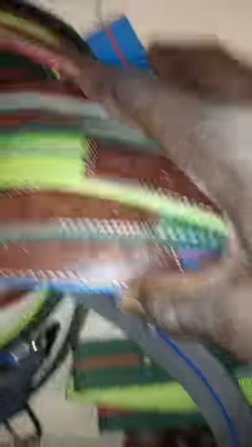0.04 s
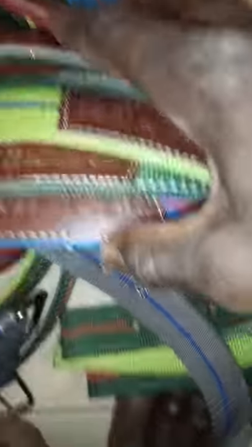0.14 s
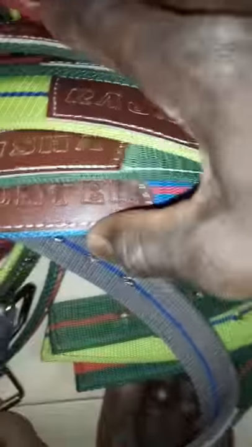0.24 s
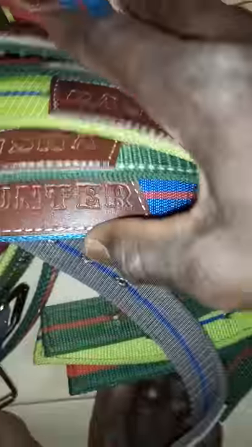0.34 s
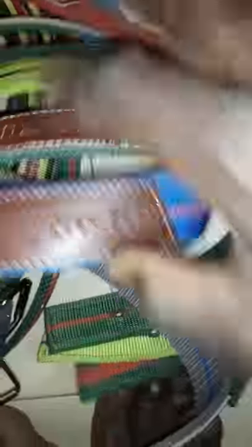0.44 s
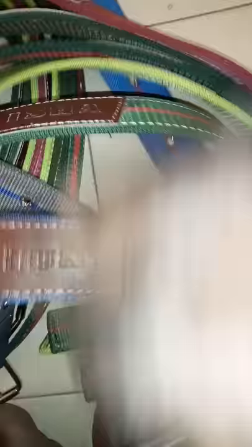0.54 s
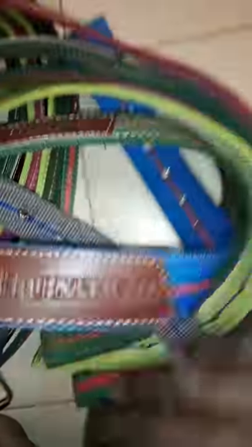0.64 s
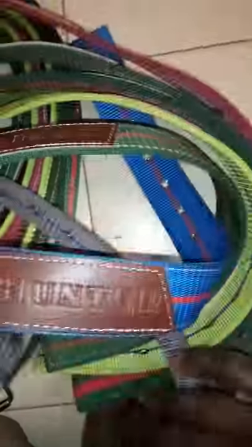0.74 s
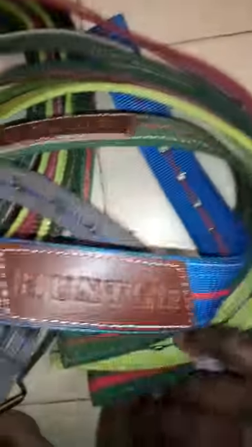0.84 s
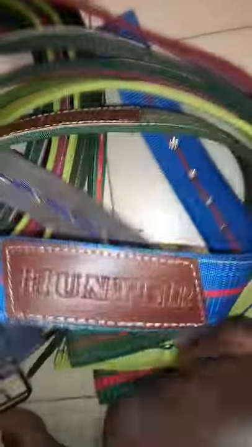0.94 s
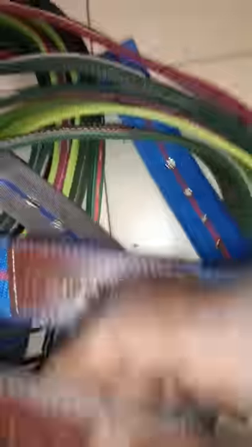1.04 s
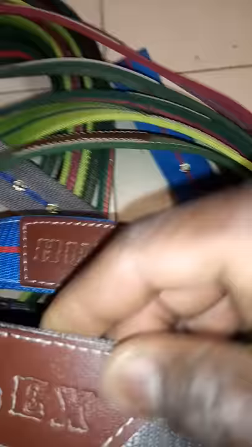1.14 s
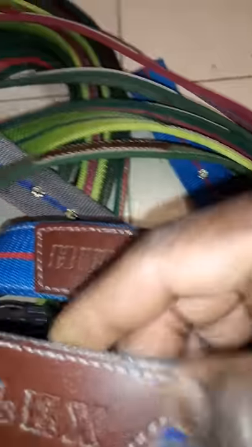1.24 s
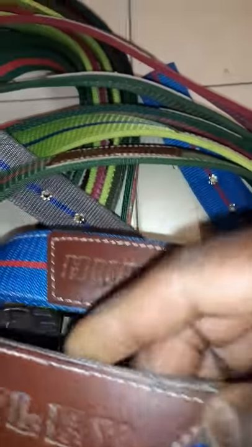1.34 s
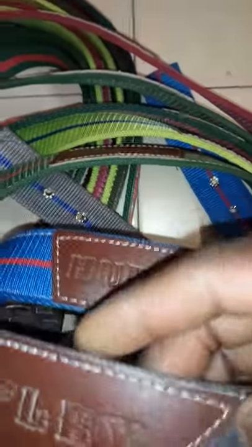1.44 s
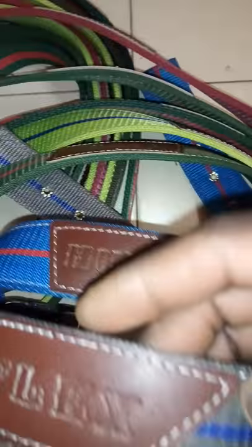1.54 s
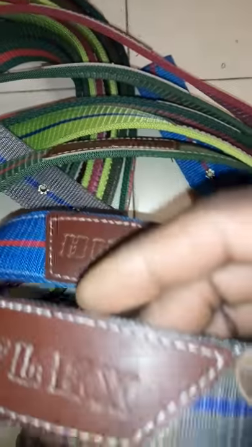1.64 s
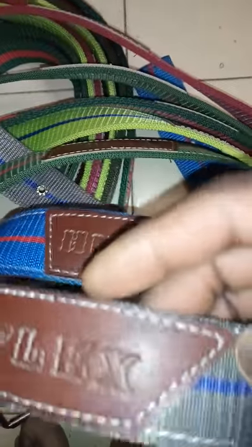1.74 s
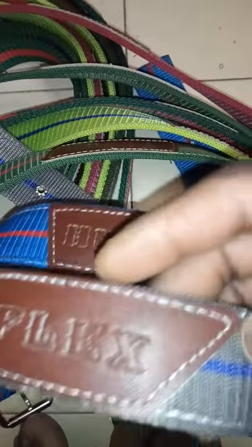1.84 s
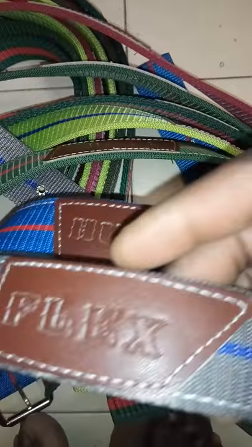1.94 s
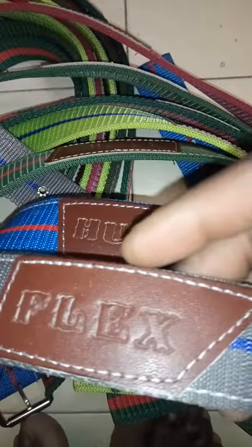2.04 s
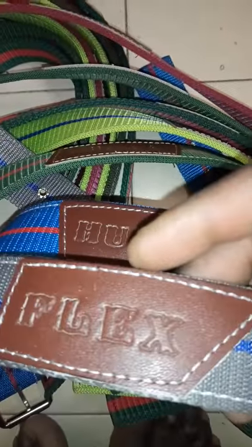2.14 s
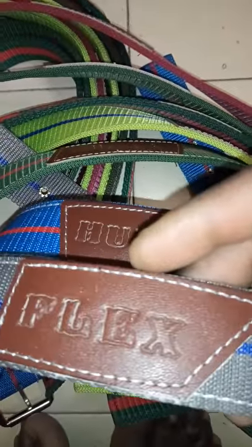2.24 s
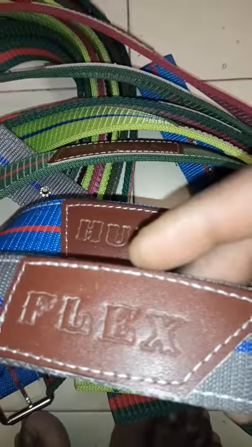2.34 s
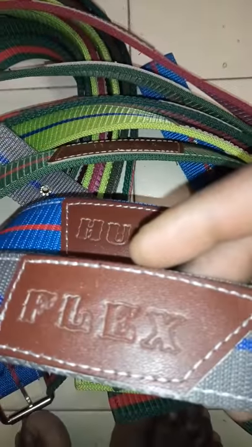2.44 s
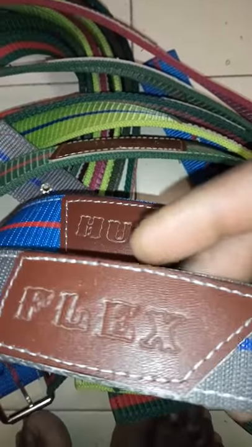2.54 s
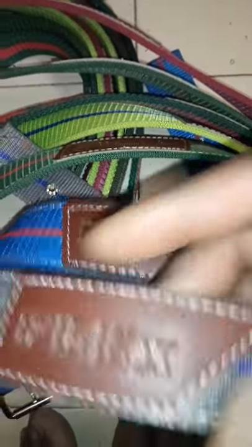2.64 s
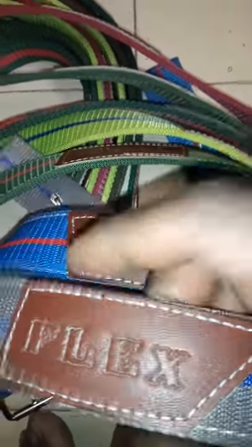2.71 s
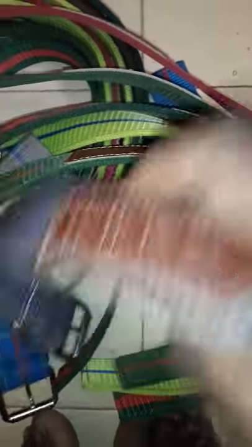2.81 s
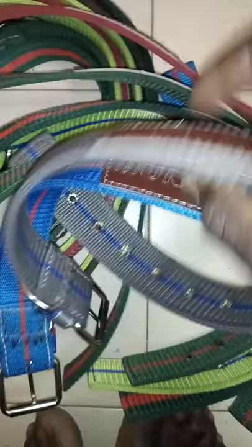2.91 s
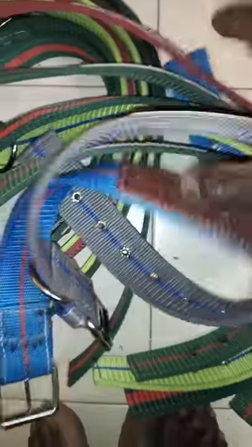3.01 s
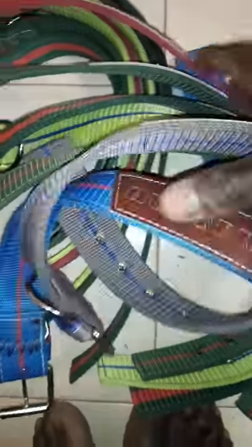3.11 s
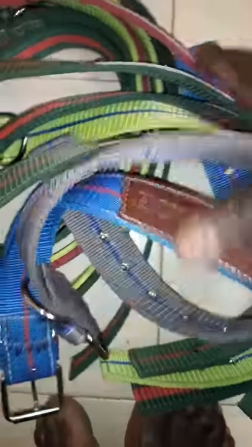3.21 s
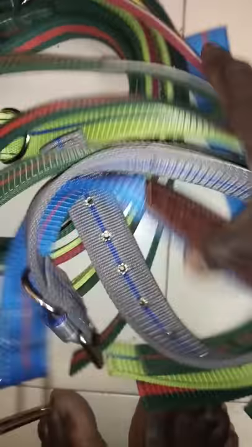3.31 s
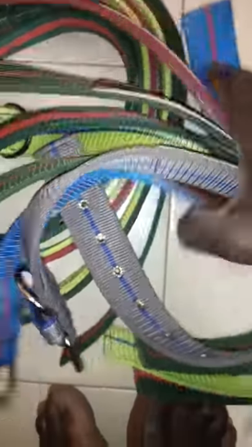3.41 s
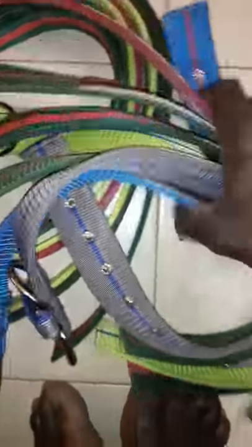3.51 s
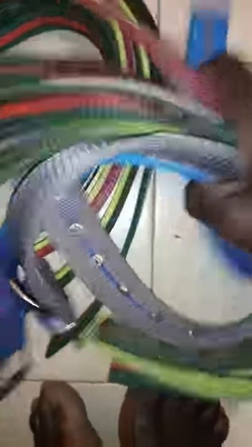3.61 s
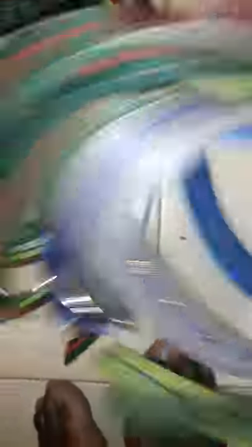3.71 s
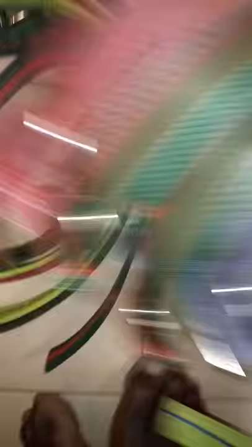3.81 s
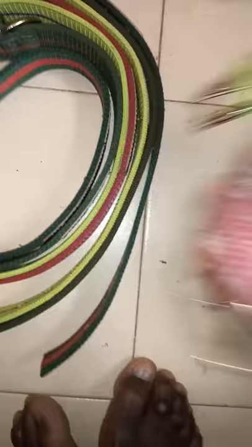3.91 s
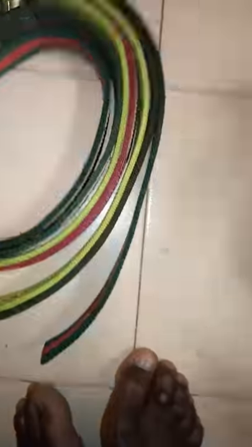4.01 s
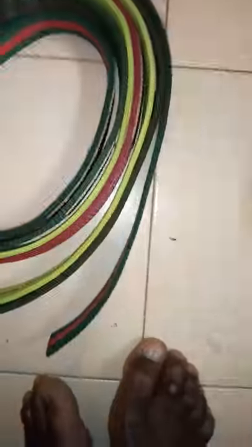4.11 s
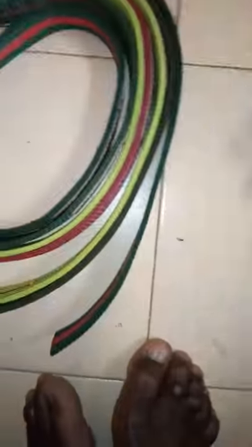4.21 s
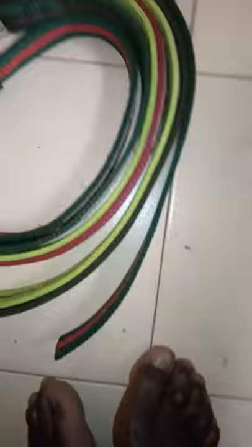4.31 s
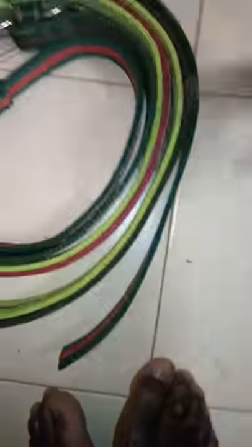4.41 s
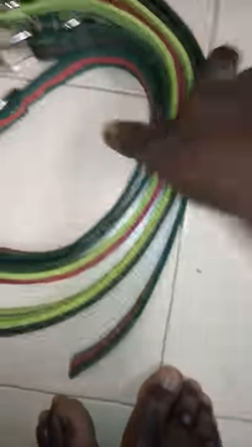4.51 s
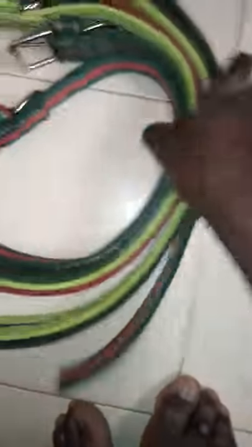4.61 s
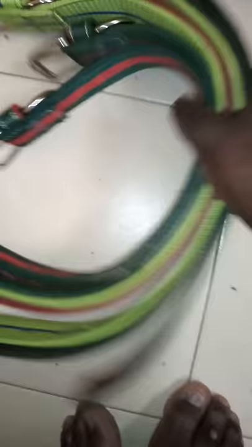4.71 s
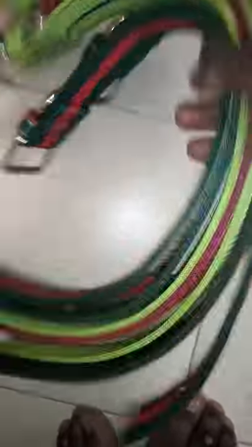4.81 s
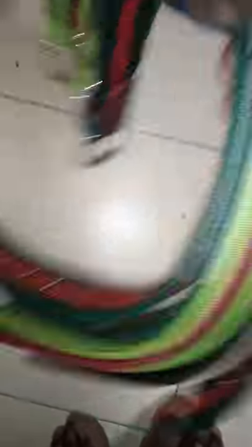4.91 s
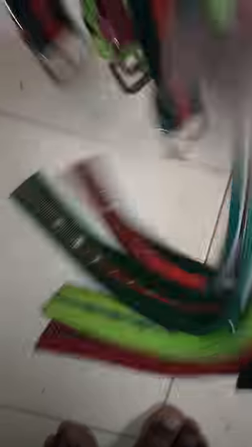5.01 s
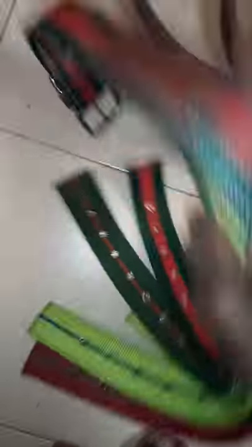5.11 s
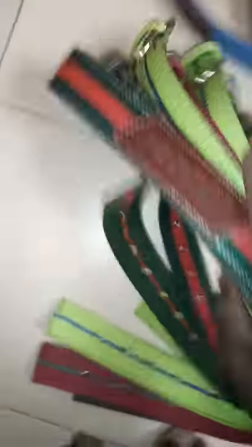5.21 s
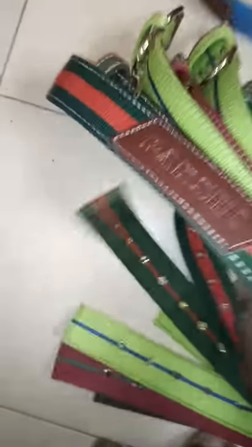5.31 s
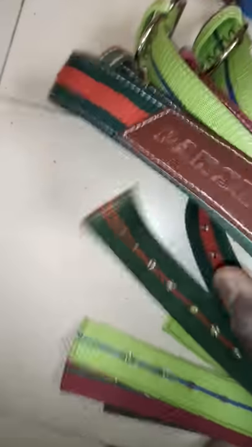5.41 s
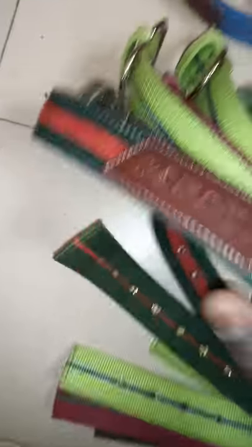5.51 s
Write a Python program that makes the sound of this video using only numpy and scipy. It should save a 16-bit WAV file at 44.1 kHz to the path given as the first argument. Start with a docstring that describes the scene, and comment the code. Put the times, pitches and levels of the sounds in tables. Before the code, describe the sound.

Stiff nylon straps are handled close to the microphone in a quiet tiled room. The webbing rustles and snaps, with soft bumps and light metal clinks. After about a second the hands rest, leaving a faint low hum and a dry tick. Then the handling returns and grows louder, with sharp clicks and buckles and rings chattering.

```python
"""A pile of nylon dog collars is handled near a microphone in a quiet tiled room with faint whines.
At first stiff webbing rustles, straps bump softly on the floor, the webbing snaps and steel clinks.
After about a second the hands rest, a low hum swells once and fades, and one dry tick follows.
Near 2.7 seconds the handling returns and grows louder, with rings and, later, buckles chattering."""
import sys
import numpy as np
from scipy import signal
from scipy.fft import rfft, irfft
from scipy.io import wavfile

SR = 44100
rng = np.random.default_rng(int(sys.argv[2]) if len(sys.argv) > 2 else 0)


def wav_record(signal):
    """Record a signal, one row per channel, as 16-bit PCM in the file named by sys.argv[1]."""
    frames = np.transpose(np.atleast_2d(signal))
    bounded = np.clip(frames, -1, 1)
    # unit amplitude maps onto the largest positive 16-bit level
    quanta = np.round(bounded * 32767).astype(np.int16)
    wavfile.write(sys.argv[1], SR, quanta)


N = 244755
TIME = np.arange(N) / SR


def from_db(db):
    return 10 ** (np.asarray(db) / 20)


def rms_one(x):
    return x / np.sqrt(np.mean(x ** 2) + 1e-20)


def in_time(rows):
    """Joins each column's points with straight lines."""
    times, *columns = np.transpose(rows)
    return [np.interp(TIME, times, column) for column in columns]


def add(out, start, sound):
    i = round(start * SR)
    out[i:i + len(sound)] += sound[:N - i]


def gate(start, end, fade_s):
    return np.clip(np.minimum(TIME - start, end - TIME) / fade_s, 0, 1)


def colour(x, points, size=8192):
    """Gives a sound a tone colour, with a minimum-phase filter so nothing sounds early."""
    hz, db = np.transpose(points)
    bin_hz = np.arange(size // 2 + 1) * SR / size
    cepstrum = irfft(np.interp(np.log(bin_hz + 1), np.log(hz), db) * np.log(10) / 20)
    cepstrum[1:size // 2] *= 2
    cepstrum[size // 2 + 1:] = 0
    impulse = irfft(np.exp(rfft(cepstrum)))
    return signal.fftconvolve(x, impulse / np.sqrt(np.sum(impulse ** 2)))[:N]


def drift(hz):
    """A slow random wobble."""
    r = np.exp(-2 * np.pi * hz / SR)
    return rms_one(signal.lfilter([1], [1, -2 * r, r * r], rng.standard_normal(N + SR))[SR:])


def ring(clicks, hz, t60):
    """Each click starts a tone that fades by 60 dB in t60 seconds."""
    r, w = from_db(-60 / (t60 * SR)), 2 * np.pi * hz / SR
    return signal.lfilter([0, np.sin(w)], [1, -2 * r * np.cos(w), r * r], clicks + 1e-18)


def catches(per_s, spread_db, clump_db):
    """Surfaces catch and let go, making clumps of tiny uneven clicks."""
    sizes = from_db(spread_db * np.minimum(rng.exponential(1, N), 4)) * rng.choice([-1, 1], N)
    happens = rng.random(N) < per_s * from_db(clump_db * drift(30)) / SR
    return rms_one(sizes * happens)


def patches(clicks, low_hz, high_hz, cycles, count=14):
    """Each click rings one patch of stiff weave, and each patch has its own pitch."""
    patch = rng.integers(0, count, N)
    pitches = np.geomspace(low_hz, high_hz, count)
    return rms_one(sum(ring(clicks * (patch == k), hz, cycles / hz) for k, hz in enumerate(pitches)))


# Tone colours of the rustle and its high hiss through the microphone, and of the strap.
# Each row: frequency in Hz, level in dB.
RUSTLE_MIC_COLOUR = [(1500, -25), (2500, -15), (3200, 1.5), (4490, 8.5), (6250, 1.5), (7300, -7.5),
                     (8300, -20.5), (11000, -81.5)]
HISS_MIC_COLOUR = [(7000, -88.5), (8500, -11), (11500, -16.5), (13300, -1.5), (14200, -15), (14800, 15.5),
                   (15600, 8.5), (16000, -24), (16800, -47)]
STRAP_COLOUR = [(100, -18), (250, -9), (500, 0), (1000, 3), (1100, 6), (2200, 5.5), (3200, 6), (6000, -105)]
# The hands at work. Each row: time in seconds, rubbing level in dB, treble level in dB.
HAND_LEVELS = [(0, -61, -67), (.43, -60.5, -73), (.45, -49, -41), (.61, -57.5, -64), (.64, -47.5, -42),
               (.79, -47.5, -61), (.95, -45.5, -51), (1.09, -53, -60), (1.2, -58, -66), (1.33, -70, -97),
               (1.62, -80.5, -107.5), (2.46, -83, -100), (2.5, -69, -88), (2.67, -67, -96),
               (2.7, -48.5, -60), (2.79, -58, -71), (2.99, -50.5, -61), (3.07, -45, -42),
               (3.12, -55.5, -70), (3.38, -38.5, -35), (3.45, -46.5, -47), (3.58, -38.5, -30.5),
               (3.93, -44.5, -40), (3.97, -38, -32.5), (4.11, -31.5, -27), (4.29, -35, -37.5),
               (4.37, -41.5, -51), (4.49, -52.5, -67), (4.67, -50.5, -49), (4.72, -38.5, -39.5),
               (4.94, -44.5, -45), (5.05, -47.5, -40), (5.16, -29, -26), (5.35, -43, -48.5),
               (5.45, -53.5, -66), (5.55, -39.5, -49)]
# The low part of the rubbing. Each row: time in seconds, level in dB.
STRAP_LEVELS = [(0, -63.5), (.43, -55.5), (.46, -51.5), (.75, -54), (1.09, -55.5), (1.2, -62), (1.33, -85),
                (1.46, -66.5), (1.6, -80.5), (2.5, -79.5), (2.66, -73), (2.72, -57.5), (3.1, -55.5),
                (3.49, -46), (3.74, -50), (3.93, -54), (3.97, -46), (4.14, -37.5), (4.34, -45.5),
                (4.5, -52.5), (4.78, -48.5), (4.9, -53.5), (5.07, -55.5), (5.1, -40.5), (5.25, -44),
                (5.42, -59), (5.55, -55)]


def rustle():
    """Rubbing threads shake the weave and the whole strap, over a smooth hiss."""
    rub_db, treble_db = in_time(HAND_LEVELS)
    strap_db, = in_time(STRAP_LEVELS)
    rub = catches(2200, spread_db=3, clump_db=3.5)
    hiss = rng.standard_normal(N)
    weave = patches(rub, 2682, 6830, cycles=84) + hiss
    treble = patches(rub, 11400, 22000, cycles=450) + hiss
    strap = patches(catches(900, spread_db=2.5, clump_db=4.5), 200, 3190, cycles=12.4) + hiss
    return (colour(weave * from_db(rub_db - 5.5), RUSTLE_MIC_COLOUR)
            + colour(treble * from_db(treble_db - 12.5), HISS_MIC_COLOUR)
            + colour(strap * from_db(strap_db - 5), STRAP_COLOUR))


# The bright colour of metal. Each row: frequency in Hz, level in dB.
GLINT_COLOUR = [(5500, -36.5), (7500, -3), (9300, 6), (11000, -1), (12500, -8), (14000, -19)]
# Steel rings give way to a buckle prong. Each row: time in seconds, the prong's share from 0 to 1.
PRONG_SHARE = [(0, 0), (4.55, 0), (4.63, 1), (5.55, 1)]


def shimmer(still_db=-85):
    """Light touches ring the metal over a thin hiss; a resting pile does not ring."""
    _, treble_db = in_time(HAND_LEVELS)
    level_db = -69 + 0.9 * (treble_db + 50)
    share, = in_time(PRONG_SHARE)
    touches = catches(300, spread_db=4, clump_db=5) * from_db(level_db) * (level_db > still_db)
    tones = CONTACT_TONES["ring"]
    struck = rng.integers(0, len(tones), N)
    steel = sum(from_db(db - 13) * ring(touches * (1 - share) * (struck == k), hz, t60=0.04)
                for k, (hz, db) in enumerate(tones))
    prong = ring(share * from_db(level_db - 19) * rng.standard_normal(N), hz=9300, t60=0.006)
    hiss = from_db(level_db - 6) * rng.standard_normal(N)
    return colour(steel + prong + hiss + from_db(-8) * touches, GLINT_COLOUR)


# The rumble's deep colour. Each row: frequency in Hz, level in dB.
RUMBLE_COLOUR = [(25, -20), (45, -17.5), (70, 2.5), (150, 3), (250, 0.5), (500, -18), (2000, -115)]
# Shifts of the grip. Each row: time in seconds, level in dB.
GRIP_SHIFTS = [(0.01, -60), (.17, -46), (.46, -55), (.62, -81), (.94, -52.5), (1.47, -65.5), (2.8, -63.5),
               (4.22, -68), (4.51, -51), (4.95, -73), (5.17, -57)]


def rumble(rise_s=0.02, fall_s=0.052):
    """The hands make an uneven rumble that surges when the grip shifts."""
    rub_db, _ = in_time(HAND_LEVELS)
    rubbing = from_db(-68.5 + 0.33 * (rub_db + 50))
    surges = sum(from_db(db) * np.exp(np.minimum((TIME - peak) / rise_s, (peak - TIME) / fall_s))
                 for peak, db in GRIP_SHIFTS)
    wobble = from_db(4.5 * drift(29))
    return colour((rubbing + surges) * wobble * rng.standard_normal(N), RUMBLE_COLOUR)


# The colour of the quiet room. Each row: frequency in Hz, level in dB.
AIR_COLOUR = [(25, -19.5), (60, 8), (300, -7), (600, -3.5), (1400, -24), (3340, -35), (6000, -21),
              (8230, -29.5), (12000, -27), (15400, -19), (16100, -67)]


def air():
    """Room air makes a soft, steady noise."""
    return from_db(-77) * colour(rng.standard_normal(N), AIR_COLOUR)


# Background whines. Each row: pitch in Hz, width in Hz, level in dB, start and end in seconds.
WHINE_TONES = [(1567, 8, -83, 0, 5.55), (3180, 20, -87, 1.2, 1.95), (1250, 30, -76, 2.45, 2.9)]


def whines():
    """Narrow bands of noise sound like faint, wavering tones."""
    out = np.zeros(N)
    for hz, width_hz, db, start, end in WHINE_TONES:
        tone = ring(rng.standard_normal(N), hz, t60=np.log(1000) / np.pi / width_hz)
        out += from_db(db) * gate(start, end, fade_s=0.026) * rms_one(tone)
    return out


def tile_echoes(x, t60=0.17):
    """Tiles send back a dense tail of echoes after a few milliseconds."""
    t = np.arange(SR // 2) / SR
    tail = rng.standard_normal(len(t)) * from_db(-60 * t / t60) * (t > 0.004)
    tail = signal.lfilter([0.4], [1, -0.6], tail)  # air and walls dull the tail
    return signal.fftconvolve(x, tail / np.sqrt(np.sum(tail ** 2)))[:N]


# Bumps of straps and fingers. Each row: start in seconds, level in dB, pitch in Hz.
SOFT_BUMPS = [(0.139, -37.5, 380), (0.365, -42.5, 690), (0.447, -39, 615), (0.466, -50, 105),
              (0.612, -48.5, 135), (0.948, -45.5, 101), (1.396, -56, 107), (1.445, -53, 105),
              (1.487, -52, 638), (2.557, -69.5, 128), (2.951, -46.5, 565), (3.955, -46, 536),
              (4.008, -32, 536), (4.502, -57, 200), (4.928, -38, 860), (4.944, -36.5, 480),
              (5.096, -38, 406), (5.362, -40, 221), (5.514, -48, 303)]


def bumps(cycles=7.7):
    """A soft push rings hollow for a few cycles."""
    out = np.zeros(N)
    for start, db, hz in SOFT_BUMPS:
        push = from_db(db + 7.5) * signal.unit_impulse(N, round(start * SR))
        out += ring(push, hz, cycles / hz)
    return signal.sosfilt(signal.butter(2, 90, "high", fs=SR, output="sos"), out)


# Webbing snaps. Each row: start in seconds, level in dB, pitch in Hz,
# then the dB added to that level for the dull knock and for the sharp edge.
WEBBING_SNAPS = [(0.1418, -29.5, 5590, -7, -23), (0.221, -41, 4100, -12, -33), (0.2414, -40, 4100, -7, -36),
                 (0.2643, -51, 5250, -11, -34), (0.2864, -40.5, 4040, -15, -45),
                 (0.3103, -40, 4060, -11, -37), (0.3691, -39.5, 2730, -2, -25),
                 (0.4043, -32, 3010, -24, -30), (0.4472, -33.5, 3680, -11, -15),
                 (0.5247, -37.5, 3220, -15, -15), (0.636, -19, 4150, -27, -19),
                 (0.6564, -24, 6100, -31, -19), (0.6808, -34, 4080, -21, -17),
                 (0.7243, -15.5, 4150, -22, -16), (0.7358, -26, 4440, -19, -16),
                 (0.8589, -30.5, 4900, -12, -14), (0.9005, -25.5, 4630, -22, -20),
                 (0.9277, -28, 4780, -23, -15), (0.985, -27.5, 4370, -25, -18),
                 (1.0083, -31, 4100, -27, -20), (1.0196, -24, 4130, -23, -28),
                 (1.0883, -23.5, 4540, -33, -14), (1.1016, -27, 4440, -27, -13.5),
                 (1.1248, -27, 4460, -36, -27), (1.381, -39, 4450, -37, -27), (1.4012, -46, 4500, -9, -46),
                 (1.4473, -41.5, 4340, -7.5, -39), (1.489, -43.5, 3040, -10, -41),
                 (1.926, -40, 4500, -45, -40), (2.4892, -42, 4440, -26, -24),
                 (2.5596, -55, 3040, -1.5, -33), (2.608, -41, 4520, -39, -42),
                 (2.6823, -40, 4200, -9.5, -21), (2.746, -29.5, 4140, -11, -17),
                 (2.7834, -41.5, 3000, -13, -28), (2.8099, -25.5, 5320, -23, -23),
                 (2.8576, -22, 4800, -26, -13), (2.8684, -30, 4800, -33, -21),
                 (2.9376, -22, 4240, -34, -24), (3.026, -32.5, 4230, -11, 1),
                 (3.0642, -24.5, 4200, -22, -3), (3.0795, -18, 5300, -25, -12),
                 (3.1448, -32, 4330, -35, -7), (3.1575, -23, 4980, -40, -23),
                 (3.1911, -22.5, 4310, -23, -24), (3.241, -22, 4800, -18, -28),
                 (3.287, -22.5, 4670, -16, -12), (3.3006, -19.5, 4250, -15.5, -18),
                 (3.3622, -20.5, 4030, -16, -9), (3.393, -15, 4300, -28, -12),
                 (3.5252, -24, 4250, -12, -10), (3.5962, -21, 6530, -14, 0.5), (3.6302, -20, 4480, -17, -9),
                 (3.7379, -11.5, 4310, -48, -14), (3.854, -22, 4230, -31, -12),
                 (3.958, -8.5, 4370, -21.5, -11.5), (4.0102, -12, 4400, -30, -7),
                 (4.0297, -11, 5540, -29, -13), (4.0637, -13, 3170, -18.5, -12),
                 (4.089, -15, 4550, -36, -18), (4.1186, -14, 4920, -23, -8), (4.1442, -19, 3660, -1, -16),
                 (4.1663, -19.5, 6250, -10, -6), (4.2093, -12, 3240, -10.5, -20),
                 (4.2264, -16.5, 6150, -27, -15), (4.272, -14.5, 3820, -15.5, -16),
                 (4.572, -29, 4320, -11, -11), (4.6304, -29.5, 6000, -21, -14),
                 (4.7086, -33, 4150, -10.5, -6), (4.8297, -21, 4620, -23, -8),
                 (4.8727, -24.5, 4380, -19.5, -11), (4.9573, -25.5, 5700, -14, -3),
                 (4.9924, -21, 4170, -16, 2.5), (5.025, -8, 4830, -26, -26), (5.0484, -13, 4530, -46, -10),
                 (5.083, -20, 4630, -36, -2), (5.0965, -11, 4580, -27, -11), (5.1282, -17.5, 5070, -38, -5),
                 (5.1816, -17, 3260, -19, -19), (5.2056, -19, 4100, -23, -5)]


def snaps(crack_s=0.00091, rattle_s=0.0092, cycles=73):
    """Stiff webbing snaps with a ringing tick, a noisy crack and a short rattle."""
    t = np.arange(SR // 8) / SR
    rise = 1 - np.exp(-(t / 0.0004) ** 2)
    burst = rise * (np.exp(-t / crack_s) + from_db(-8) * np.exp(-t / rattle_s))
    crack, edge, knock, ticks = np.zeros((4, N))
    for start, db, hz, knock_db, edge_db in WEBBING_SNAPS:
        add(crack, start, from_db(db - 6) * burst)
        add(edge, start, from_db(db + edge_db + 1.5) * burst)
        add(knock, start, from_db(db + knock_db + 1.5) * burst)
        add(ticks, start, rise * from_db(db - 4 - 60 * t * hz / cycles) * np.sin(2 * np.pi * hz * t))
    noise = rng.standard_normal(N)
    bright = colour(edge * noise, HISS_MIC_COLOUR) + from_db(-15.5) * colour(edge * noise, GLINT_COLOUR)
    return ticks + bright + colour(crack * noise, RUSTLE_MIC_COLOUR) + colour(knock * noise, STRAP_COLOUR)


# The tones of a dry tick (first entry), then of each metal piece. Each row: pitch in Hz, level in dB.
CONTACT_TONES = {"tag": [(3180, -16.5), (3850, -6), (4330, -2), (5100, -9.5)], "plate": [(1065, -10),
                 (2060, 0.5)], "ring": [(8250, -9), (11000, -20), (14670, 0.5)], "roller": [(12980, -10),
                 (13450, -33), (14840, 1), (15200, -10)], "buckle": [(9250, -10), (10240, -12), (13350, -5),
                 (14900, 3)]}
# One short, dry tick in the lull (first row), then the metal clinks.
# Each row: start in seconds, length of contact in seconds, level in dB, which tones ring.
CONTACTS = [(1.9228, 0.0074, -38.5, "tag"), (3.752, 0.052, -50, "plate"), (4.046, 0.18, -56, "plate"),
            (4.211, 0.19, -36.5, "plate"), (0.473, 0.093, -41, "ring"), (0.674, 0.031, -44, "roller"),
            (0.724, 0.026, -35.5, "roller"), (0.837, 0.12, -50, "roller"), (0.939, .05, -43, "roller"),
            (.989, 0.018, -46, "roller"), (1.095, 0.014, -43, "roller"), (2.993, 0.02, -61, "ring"),
            (3.025, 0.06, -34, "ring"), (3.143, .024, -50, "ring"), (3.352, .064, -35.5, "ring"),
            (3.432, 0.07, -38.5, "ring"), (3.529, 0.014, -35.5, "ring"), (3.678, 0.024, -38, "ring"),
            (3.733, .03, -31.5, "roller"), (3.746, 0.046, -36, "ring"), (3.856, 0.09, -35, "ring"),
            (4.011, .01, -33.5, "buckle"), (4.223, 0.037, -52.5, "ring"), (4.265, 0.03, -32, "ring"),
            (4.568, 0.028, -46, "roller"), (4.62, 0.024, -57, "buckle"), (4.707, 0.028, -38, "buckle"),
            (4.744, 0.09, -40.5, "buckle"), (4.817, 0.018, -41, "buckle"), (4.876, 0.024, -42.5, "buckle"),
            (5.06, .03, -45, "buckle")]


def clinks_and_dry_tick(touches_per_s=600, fade_db=-6):
    """One contact is many tiny touches, so each tone swells and wavers."""
    out, t = np.zeros(N), np.arange(SR // 3) / SR
    for start, contact_s, db, name in CONTACTS:
        for hz, tone_db in CONTACT_TONES[name]:
            chance, strength = rng.random((2, len(t)))
            touches = (chance < touches_per_s / SR) * (2 * strength - 1) * (t < contact_s)
            touches[0] = 1
            ping = ring(touches * from_db(fade_db * t / contact_s), hz, t60=0.035)
            ping = ring(ping, hz, t60=1.3 / 300)  # glancing touches make little sound far from the pitch
            level = from_db(db + tone_db + rng.normal(3, 3))
            add(out, start, level * ping / np.max(np.abs(ping)))
    return out


def hum(hz=63.6, peak_s=1.476, rise_db_per_s=49, fall_db_per_s=44):
    """One low tone swells and fades."""
    swell_db = np.minimum(rise_db_per_s * (TIME - peak_s), fall_db_per_s * (peak_s - TIME))
    tone = np.sqrt(2) * np.sin(2 * np.pi * hz * TIME)
    return gate(1.13, 1.87, fade_s=0.054) * from_db(swell_db - 55.5) * tone


def scene():
    """The pile and its echoes, over the background sounds."""
    pile = rustle() + snaps() + clinks_and_dry_tick() + shimmer() + bumps()
    return (pile + from_db(-15) * tile_echoes(pile) + air() + rumble() + whines() + hum())[None]


def record(dry, cutoff_hz=16979):
    """The highest treble is cut steeply."""
    return signal.sosfilt(signal.cheby2(12, 70, cutoff_hz, fs=SR, output="sos"), dry)


dry = scene()
out = record(dry)
wav_record(out)
```